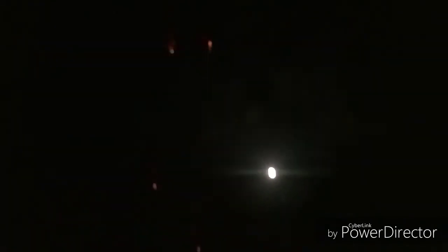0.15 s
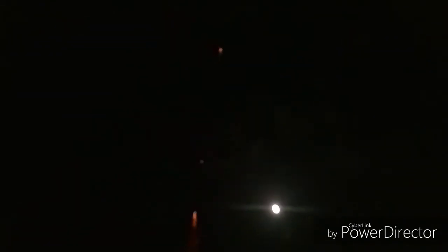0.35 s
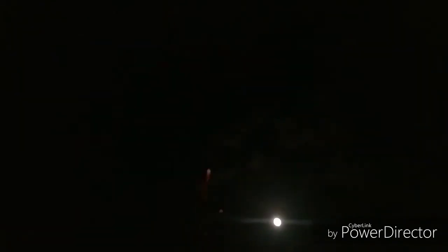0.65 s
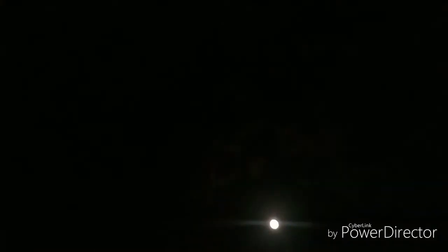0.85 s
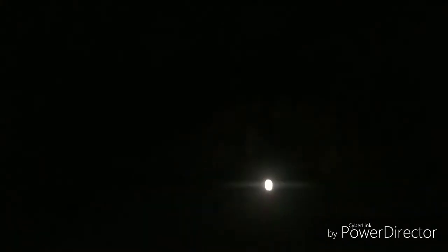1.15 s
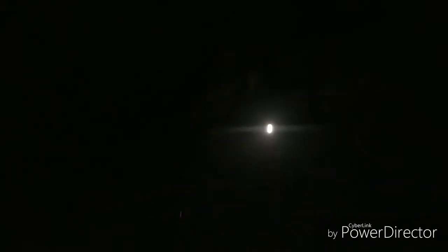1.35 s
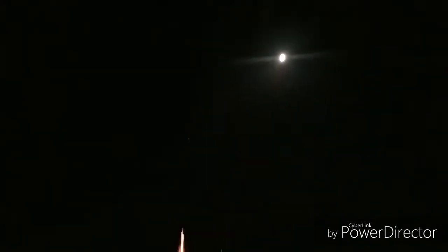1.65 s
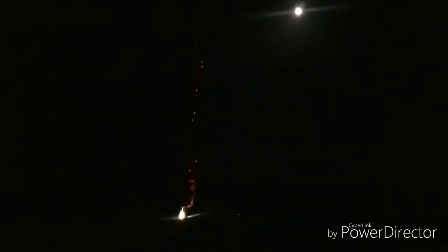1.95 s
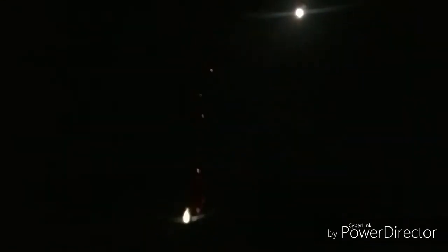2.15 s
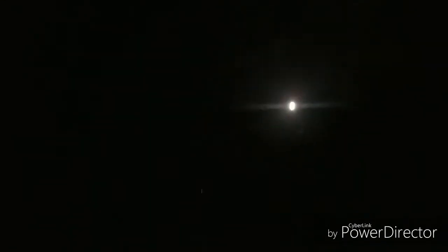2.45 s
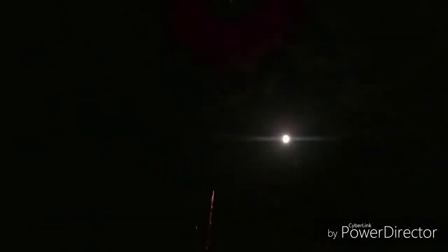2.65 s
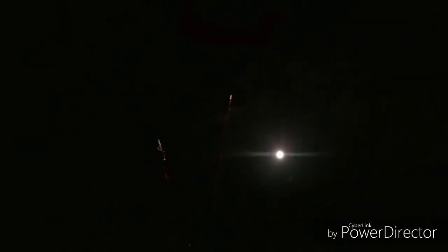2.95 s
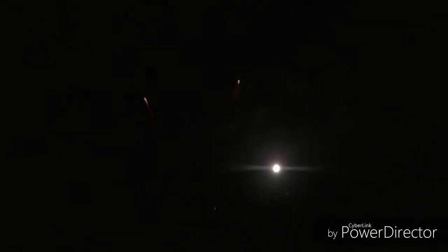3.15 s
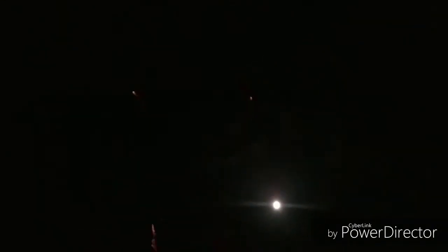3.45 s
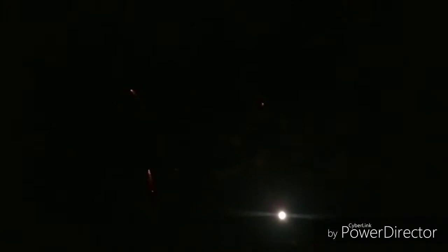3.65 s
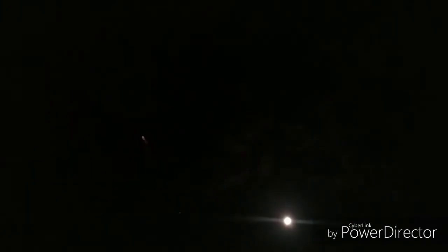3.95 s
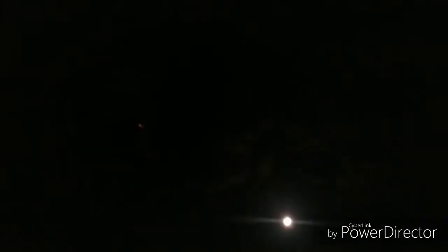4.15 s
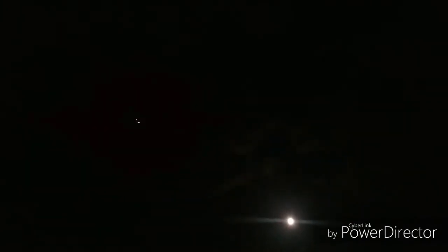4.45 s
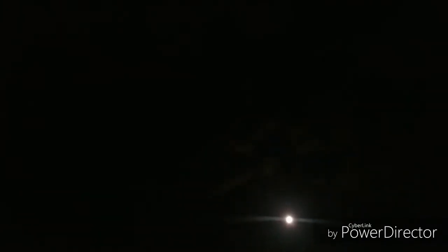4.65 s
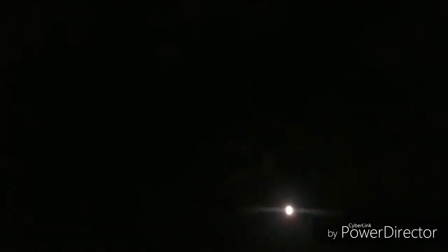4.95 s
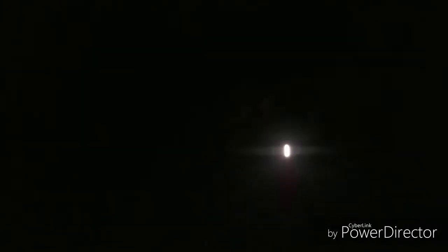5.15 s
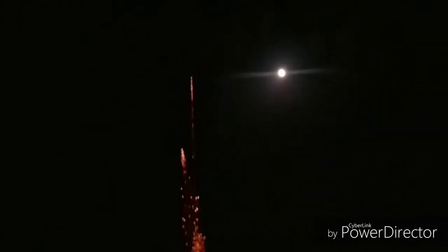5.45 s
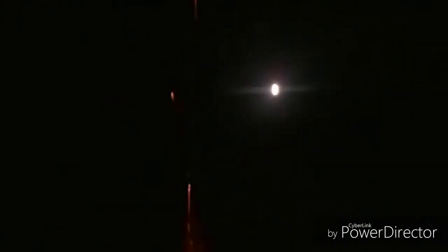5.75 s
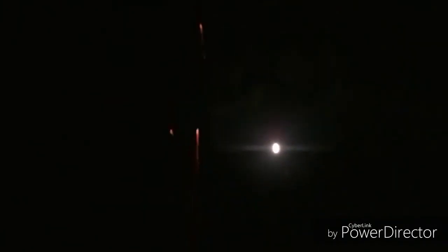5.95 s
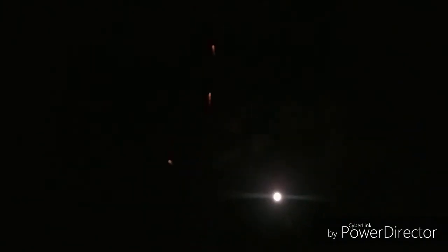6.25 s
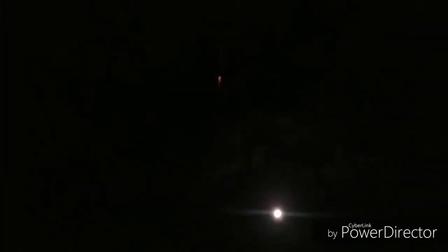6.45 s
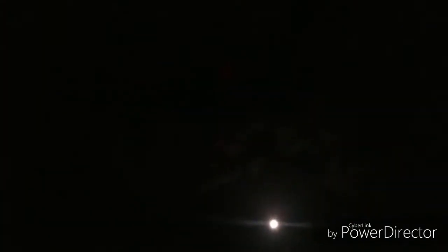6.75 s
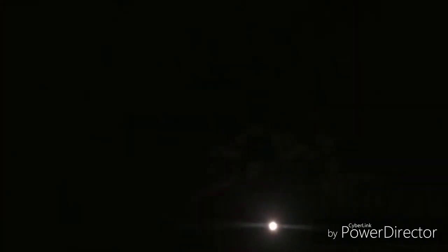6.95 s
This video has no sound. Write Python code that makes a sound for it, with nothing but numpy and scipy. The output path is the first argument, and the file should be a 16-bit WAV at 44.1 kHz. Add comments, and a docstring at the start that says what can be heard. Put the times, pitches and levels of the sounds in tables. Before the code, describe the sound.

A night yard with fireworks close to a phone: very quiet hum, hiss and fine fuse fizz under abrupt, very loud bangs. A crack hits at once, with a faint lift puff at 0.07 s, then cracks at 0.23, 0.34, 0.56, 0.84 and 1.14 s. Each is an instant snap, doubled milliseconds later off the ground, followed by brief noisy scatter, a wall slap about 0.06 s later and a smeared far echo near 0.2 s. A faint echo comes at 1.5, a soft launch puff at 1.75 and a firmer hollow thump at 2.6. A powerful crack at 2.74 is followed by others at 3.33, a close pair at 3.86 to 3.90, and 4.5. After a lull, lifts thump at 5.3 and 5.75, strongest at 6.24, then 6.39. A huge double crack at 6.46 opens the last volley, with bangs at 6.6, 6.7 and 6.93, ending in echoes around 7.1.

```python
"""Firework tubes at night in a yard, near a phone: a hum, a hiss and the fizz of fuses lie under everything.
At once stars crack overhead, as damped pressure jumps that come again off the ground; lift charges thump
in their tubes as low damped swings, led by a spit of noise. Stars follow up to 4.5 s, with lone far echoes.
Lifts gather from 5.1 s, the strongest thumps at 6.2 s, and a last volley of stars cracks until 7 s.
After each star the yard scatters coloured noise, a house wall slaps back and far houses answer in a smear."""
import sys
import numpy as np
from scipy import signal
from scipy.fft import rfft, irfft, next_fast_len
from scipy.io import wavfile
from scipy.ndimage import uniform_filter1d

SR = 44100
rng = np.random.default_rng(int(sys.argv[2]) if len(sys.argv) > 2 else 0)


def master(y):
    """Save y as 16-bit WAV."""
    cut = np.clip(np.atleast_2d(y).T, -1, 1)
    pcm = np.round(cut * 32767)  # scale
    wavfile.write(sys.argv[1], SR, pcm.astype(np.int16))


N = 312669  # samples in the scene
SPAN = 19200  # samples given to one event and its echoes

# Stars bursting: start_s, crack_db, blast_ms, ground_delay_ms, ground_db (over the crack), boom_db,
# echo_db, wall_delay_ms, far_delay_ms, far_spread_ms
STAR_BURSTS = [(.0007, 3, 0.19, 1.92, -11, -4, -23, 63.7, 185, 40),
               (.2318, 2, 0.16, 7.2, -4, -11, -30.5, 60.6, 180, 56),
               (0.341, -0.5, 0.13, 5.1, 1, -12.5, -31.5, 60.5, 185, 52),
               (.562, -1, .17, 7.86, -3, -31.5, -34, 58.3, 200, 42),
               (0.8399, -7, 0.31, 6.2, 3, -26, -32.5, 64, 213, 40),
               (1.1395, -2.5, 0.11, 2.14, -6.5, -18, -33.5, 63, 205, 16),
               (2.7373, 5, 0.26, 7.36, -4, -24, -23.5, 61, 159, 53),
               (3.3301, -5.5, 0.46, 3.3, 3.5, -16, -30, 64.8, 210, 52),
               (3.861, -3, 0.24, 4.96, 2, -24, -32, 65, 175, 40),
               (3.904, -2, 0.25, 7.2, 1, -21.5, -32.5, 53.5, 204, 46),
               (4.496, -5.5, 0.22, 7.1, -1, -45.5, -37, 53.9, 178, 33),
               (6.4583, 7, 0.26, 7.1, -4, -10, -27, 62, 150, 58),
               (6.4711, 4.5, 0.17, 5.4, -33, -19, -28, 50, 180, 58),
               (6.5951, -3.5, 0.031, 1.27, 7.5, -11, -32, 61.3, 165, 32),
               (6.699, -1, 0.19, 7.8, -1, -23.5, -33, 60.3, 190, 52),
               (6.9266, -2, 0.23, 4.65, -3, -12.5, -31, 62.3, 125, 37)]
# Lift charges: start_s, puff_db, tube_db, gas_db, gas_treble_db, gas_lead_ms, wall_delay_ms, slap_db
LIFT_CHARGES = [(0.074, -16, -29.5, -27, -42, 3.5, 89, -55),
                (1.754, -27.5, -28.5, -39.5, -44, 2.9, 64, -70),
                (2.399, -62.5, -38.5, -61, -51.5, 19.5, 66, -88),
                (2.5959, -10.5, -14.5, -27, -61, 3.2, 67, -45),
                (5.135, -66, -62.5, -71.5, -66.5, 38, 64, -87.5),
                (5.3082, -14.5, -15.5, -24, -32.5, 2.5, 63, -68),
                (5.3213, -14, -29, -32.5, -38, 1.2, 67, -59),
                (5.7525, -16, -16.5, -24.5, -33.5, 2.6, 64, -49),
                (6.238, -6.5, 0.5, -11.5, -39.5, .4, 61.5, -24.5),
                (6.3943, -16.5, -14, -22.5, -39, 5.2, 64, -52)]
# Lone echoes from far off: start_s, level_db
LONE_ECHOES = [(1.528, -52.5), (2.979, -46), (3.771, -64.5), (4.264, -61)]
# Background levels through the night: time_s, hum_db, hiss_db
NIGHT_LEVELS = [(0, -68, -63), (1.3, -68, -71.5), (1.7, -73.5, -81), (1.9, -65, -72.5), (2.2, -61.5, -72),
                (2.6, -57.5, -71), (2.8, -63, -82), (3.3, -69.5, -80), (3.6, -64, -77), (4.3, -72, -81.5),
                (5.1, -66.5, -76), (5.3, -60, -71), (5.6, -60, -68.5), (6.2, -61, -69.5), (6.4, -63, -75),
                (7.09, -72, -89)]

# Relative noise spectra: frequency_hz, density_db (per Hz)
HUM_SPECTRUM = [(30, -40), (60, -9), (130, -5), (250, -3), (500, -14), (900, -18.5), (1500, -32),
                (3000, -65)]
HISS_SPECTRUM = [(300, -20), (800, -2.5), (1300, -5.5), (2000, 2), (3000, -5), (4500, -20), (6200, -18),
                 (9000, -36.5)]
# Burning fuses, also the treble of the gas
FIZZ_SPECTRUM = [(3000, -31), (6000, 4.5), (8500, -8), (11000, 1), (14000, -3), (16500, -5.5)]
# Sound scattered about the yard
YARD_SPECTRUM = [(60, -42), (120, -12), (400, -14), (800, -1.5), (1200, -2.5), (1700, -0.5), (2300, -3),
                 (3200, -8.5), (4000, -9.5), (5700, -8.5), (7000, -19), (8800, -37.5), (14000, -23),
                 (16400, -51.5)]
# Low answer of the yard to a tube
RUMBLE_SPECTRUM = [(40, -35), (90, 0), (150, -0.5), (350, -6), (800, -18.5), (2500, -32.5), (5000, -56)]
# Answer of the far houses
HOUSES_SPECTRUM = [(40, -40.5), (80, -7.5), (350, -2.5), (700, -7.5), (1200, -3), (1800, -7.5),
                   (2450, -11.5), (2950, -20), (3500, -13.5), (5700, -16.5), (7200, -28.5), (9000, -47),
                   (13000, -56.5)]
# Slap off the house wall
WALL_SPECTRUM = [(180, -43.5), (300, -16), (1570, 1), (3630, -5), (4590, -11.5), (5340, -9.5),
                 (8110, -42.5), (12700, -50.5), (15100, -51), (16400, -86.5)]
# Spit of gas at the muzzle
GAS_SPECTRUM = [(880, -55.5), (1500, -4.5), (2380, -11), (3370, -6.5), (3800, -1.5), (4510, -13.5),
                (5450, 1), (8550, -24), (14400, -24), (16400, -23)]

# Colour of a star's blast as the phone hears it: frequency_hz, gain_db
BLAST_COLOUR = [(30, -42.5), (90, -21.5), (200, 1), (500, 5.5), (1200, 2), (1700, 4.5), (2800, -6),
                (5600, 0), (7500, -11.5), (9500, -25), (14000, -5.5), (16000, 0.5)]
# Colour of a lift puff as the phone hears it: frequency_hz, gain_db
PUFF_COLOUR = [(60, -6), (300, -10.5), (750, 9), (1300, -17.5), (2500, -1.5), (3300, -11), (5600, -32),
               (8500, -40), (14000, -2)]
# Decay of the scattered sound by 60 dB: frequency_hz, decay_s
YARD_DECAY = [(150, .6), (1000, .24), (5000, .27), (9000, .25), (14000, .21)]
# Mean copies of a blast off hand and body: delay_ms, level_db
NEARBY_COPIES = [(0.749, -3), (1.7, -7), (2.502, -7.5), (3.298, -19.5)]
# Left minus right level: frequency_hz, difference_db
STEREO_LEAN = [(300, 0), (1300, -1), (2400, -1.8), (4400, -3.2), (7000, -3.5), (13000, 0)]

FIZZ_DB = -18.5  # over the hum
COPY_SCATTER_DB = 3  # standard deviation of the nearby copies
WALL_FRONT = 1.3  # gain of the slap's sharp front
PUFF_MS, TUBE_HZ = 0.33, 503
LIFT_YARD_DB, GAS_ECHO_DB = -22.5, -20  # both over the gas
RUMBLE_DB, RUMBLE_TOP_DB, RUMBLE_S = -20.5, -36.5, 0.088  # over the tube, its ceiling, fading time
GAS_FALL_S, GAS_FALL_OVER_LEAD = 0.0021, 0.18  # a slow leak also dies slowly
BOOM_HZ = 263  # starting pitch
WALL_DB, FAR_DB = 12, -15.5  # over the echo strength
WALL_GROUND_DB = -6  # the wall also returns the ground copy
FAR_SPREAD_MS, FAR_FOCUS_DB = 40, 16  # usual spread; an answer bunched into a tenth of it gains 16 dB
TILT_DB, TILT_DB_PER_MS = 0.53, 0.2682  # per octave; a higher star (later ground copy) echoes brighter
AIR_HZ, AIR_DB, AIR_DB_PER_DB = 9800, -2.5, 0.01  # every star loses nearly the same treble above AIR_HZ
TOP_HZ = 15900  # upper band limit


def amp(db):
    """Level law: twenty decibels are a tenfold amplitude."""
    return 10 ** (np.asarray(db) / 20)


def unit(x):
    """Normalisation: scale to an rms of 1."""
    return x / np.sqrt(np.mean(x ** 2) + 1e-20)


def along(points, hz):
    """Interpolation of a table's values on a logarithmic frequency axis."""
    f, v = np.transpose(points)
    return np.interp(np.log(hz + 1), np.log(f + 1), v)


def filtered(x, response):
    """Linear filtering: the spectrum is multiplied by a response of frequency."""
    size = next_fast_len(x.shape[-1] + 4096)
    spectrum = rfft(x, size) * response(np.fft.rfftfreq(size, 1 / SR))
    return irfft(spectrum, size)[..., :x.shape[-1]]


def noise(spectrum, size):
    """Coloured noise: white noise shaped by a spectrum, at an rms of 1."""
    white = rng.standard_normal(size)
    return unit(filtered(white, lambda hz: amp(along(spectrum, hz))))


def causal(spectrum):
    """Minimum phase: the folded cepstrum gives an impulse response of the wanted colour."""
    gain = amp(along(spectrum, np.fft.rfftfreq(4096, 1 / SR)))
    cepstrum = irfft(np.log(gain + 1e-6))
    cepstrum[1:2048] *= 2
    cepstrum[2049:] = 0
    return irfft(np.exp(rfft(cepstrum)))[:1024]


def late(x, ms):
    """Propagation delay: the signal arrives later, cut to its own length."""
    return np.pad(x, (round(abs(ms) * SR / 1000), 0))[:len(x)]


def add(track, s, x):
    """Superposition: mix a sound into the track from time s."""
    track[round(s * SR):][:len(x)] += x


def patchy(x, depth_db):
    """Random modulation: blotches of gain, smoothed over time and frequency."""
    z = signal.stft(x, nperseg=256)[2]
    field = uniform_filter1d(rng.standard_normal(z.shape), size=6, axis=0)
    field = uniform_filter1d(field, size=8, axis=1)
    return unit(signal.istft(z * amp(depth_db * unit(field)), nperseg=256)[1][:len(x)])


def night():
    """Stationary coloured noise under slow level curves; opposed noise widens hiss and fizz."""
    s, *levels = np.transpose(NIGHT_LEVELS)
    hum_db, hiss_db = (np.interp(np.arange(N) / SR, s, db) for db in levels)
    sides = [[1], [-1]]  # opposite signs left and right
    hum = patchy(noise(HUM_SPECTRUM, N), depth_db=2.0)
    hiss = patchy(noise(HISS_SPECTRUM, N), depth_db=1.0) + .12 * noise(HISS_SPECTRUM, N) * sides
    fizz = patchy(noise(FIZZ_SPECTRUM, N), depth_db=1.4) + .4 * noise(FIZZ_SPECTRUM, N) * sides
    return amp(hum_db) * (hum + amp(FIZZ_DB) * fizz) + amp(hiss_db) * hiss


def scatter(t):
    """Diffuse reverberation: sound strewn about the yard, each band with its own decay time."""
    diffuse = patchy(noise(YARD_SPECTRUM, len(t)), depth_db=3.0)
    hz, frames, z = signal.stft(diffuse, SR, nperseg=256)
    decay = amp(-60 * frames / along(YARD_DECAY, hz)[:, None])
    tail = signal.istft(z * decay, SR, nperseg=256)[1][:len(t)]
    return amp(6.5) * tail * (1 - np.exp(-t / 0.00069))


def blast(ms, colour, copies_db, t):
    """Blast wave: a pressure jump, then suction, of peak 1 before grit and nearby copies join it."""
    rest, t = len(t) - 2048, t[:2048]
    u = t * 1000 / abs(ms)
    jump = signal.fftconvolve((1 - u) * np.exp(-u), causal(colour))[:len(t)]
    jump = jump / np.abs(jump).max()
    grit = 0.32 * amp(-60 * t / 0.012) * noise(YARD_SPECTRUM, len(t))
    copies = 0
    for lag_ms, db in NEARBY_COPIES:
        gain = amp(db + rng.normal(0, COPY_SCATTER_DB))
        copies = copies + gain * late(jump, lag_ms + rng.normal(0, 0.12))
    return np.pad(jump + amp(copies_db) * (grit + copies), (0, rest))


def thump(hz, cycles, t60, t):
    """Damped low thump, negative swing first; the phone's low filter makes each swing longer than the last."""
    turns = cycles * np.log(1 + hz * t / cycles)
    swing = -np.sin(2 * np.pi * turns) * amp(-60 * t / t60) * (1 - np.exp(-t / 0.00042))
    return late(swing, 0.97)


def slap(t):
    """Reflection off a rough wall: a sharp front, then a short diffuse wake."""
    rest, t = len(t) - 6400, t[:6400]
    decay = amp(-60 * t / 0.0049) + amp(-7 - 60 * t / .07)  # steep, then shallow
    wake = decay * (1 - np.exp(-(t / 0.0021) ** 2))
    wake = wake * patchy(noise(WALL_SPECTRUM, len(t)), depth_db=2.5)
    return np.pad(WALL_FRONT * blast(.11, WALL_SPECTRUM, -2, t) + wake, (0, rest))


def far_houses(far_ms, spread_ms, t):
    """Overlapping distant reflections: noise that swells, ends quickly and lingers with dulled treble."""
    after = (t * 1000 - far_ms) / spread_ms
    front = amp(np.where(after < 0, 3 * after, -8 * np.abs(after) ** 1.4))
    linger = amp(-13.5 - 4.3 * np.abs(after))  # the farthest roofs fade last
    answer = patchy(noise(HOUSES_SPECTRUM, SPAN), depth_db=3.8)
    # air takes the treble off long paths
    dulled = filtered(answer, lambda hz: 1 / (1 + (hz / 3500) ** 2))
    edges = (1 - np.exp(-t / .08)) * (1 - (t / t[-1]) ** 8)
    return (front * answer + linger * dulled) * edges


def lone_echoes():
    """Isolated reflections: short decaying bursts of noise in the colour of the far houses."""
    out, t = np.zeros(N + SPAN), np.arange(SPAN) / SR
    for s, db in LONE_ECHOES:
        envelope = amp(db - 1.0 - 60 * t / 0.022) * (1 - np.exp(-t / 0.00034))
        add(out, s, envelope * noise(HOUSES_SPECTRUM, SPAN))
    return out[:N]


def lifts():
    """Jet noise and resonance: gas leaks past the star, a puff rings the tube, the wall returns them."""
    out, t = np.zeros(N + SPAN), np.arange(SPAN) / SR
    lead = 68  # ms kept ahead of the puff for the leaking gas
    for s, puff_db, tube_db, gas_db, treble_db, gas_ms, wall_ms, slap_db in LIFT_CHARGES:
        puff = amp(puff_db) * blast(PUFF_MS, PUFF_COLOUR, -1.5, t)
        puff = puff + amp(tube_db) * thump(TUBE_HZ, 0.91, 0.033, t)

        rumble = np.exp(-(t / RUMBLE_S) ** 2) * (1 - np.exp(-t / 0.009))
        rumble = rumble * patchy(noise(RUMBLE_SPECTRUM, SPAN), depth_db=4.5)
        rumble_db = min(tube_db + RUMBLE_DB, RUMBLE_TOP_DB)
        yard = amp(gas_db + LIFT_YARD_DB) * scatter(t) + amp(rumble_db) * rumble
        yard = yard + amp(slap_db) * late(slap(t), wall_ms)

        # the gas grows exponentially to a height 3 ms after the puff's start, then falls
        after = t - (lead + 3) / 1000
        rise = after * 1000 / abs(gas_ms)
        fall_s = GAS_FALL_S + GAS_FALL_OVER_LEAD * abs(gas_ms) / 1000
        spit = amp(gas_db) * noise(GAS_SPECTRUM, SPAN) + amp(treble_db) * noise(FIZZ_SPECTRUM, SPAN)
        gas = np.exp(np.minimum(rise, -after / fall_s)) * spit
        back = np.exp(np.minimum(rise, -after / 0.005)) * noise(GAS_SPECTRUM, SPAN)
        gas_echo = amp(gas_db + GAS_ECHO_DB) * late(back, wall_ms)
        add(out, s - .0002 - lead / 1000, gas + late(puff + yard, lead) + gas_echo)
    return out[:N]


def bursts():
    """Direct and reflected blast waves: crack, ground copy and boom, then yard, wall and far houses."""
    out, t = np.zeros(N + SPAN), np.arange(SPAN) / SR
    for (s, db, ms, ground_ms, ground_db, boom_db, echo_db,
         wall_ms, far_ms, spread_ms) in STAR_BURSTS:
        crack = amp(db) * blast(ms, BLAST_COLOUR, -0.12, t)
        ring_s = 0.027 + .07 * min(amp(boom_db), 1)  # a stronger boom rings longer
        ground = amp(db + ground_db) * blast(ms, BLAST_COLOUR, 1.7, t)
        ground = ground + amp(boom_db) * thump(BOOM_HZ, 1.3, ring_s, t)

        wall = slap(t) + amp(WALL_GROUND_DB + min(ground_db, 0)) * late(slap(t), ground_ms)
        far_db = FAR_DB + FAR_FOCUS_DB * np.log10(FAR_SPREAD_MS / spread_ms)
        far = amp(far_db) * far_houses(far_ms, spread_ms, t)
        echoes = amp(echo_db) * (scatter(t) + amp(WALL_DB) * late(wall, wall_ms) + far)
        tilt_db = TILT_DB + TILT_DB_PER_MS * ground_ms
        echoes = filtered(echoes, lambda hz: amp(tilt_db * np.log2(np.clip(hz, 300, 8000) / 2000)))

        heard = crack + late(ground, ground_ms) + echoes
        top = amp(AIR_DB + AIR_DB_PER_DB * db)  # gain left in the far treble
        heard = filtered(heard, lambda hz: top + (1 - top) / (1 + 1j * hz / AIR_HZ) ** 2)
        add(out, max(s - .0002, 0), heard)
    return out[:N]


def scene():
    """Superposition of the night, the lone echoes, the lifts and the stars."""
    return night() + lone_echoes() + lifts() + bursts()


def record(dry):
    """Transducer response: a stereo lean, lost deep bass, flattened peaks and an upper band limit."""
    leaning = filtered(dry, lambda hz: amp(along(STEREO_LEAN, hz) * [[.5], [-.5]]))
    thin = signal.sosfilt(signal.butter(2, 50, "high", fs=SR, output="sos"), leaning)
    flat = thin / (1 + np.abs(thin / .98) ** 6) ** (1 / 6)
    return filtered(flat, lambda hz: 1 / (1 + (hz / TOP_HZ) ** 80))


dry = scene()
out = record(dry)
master(out)
```